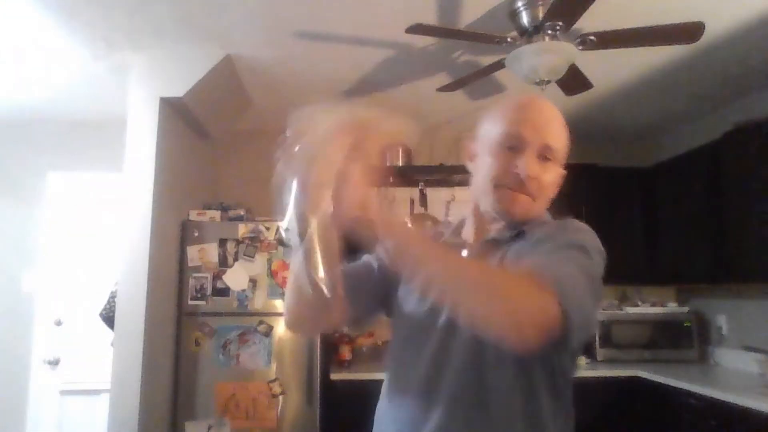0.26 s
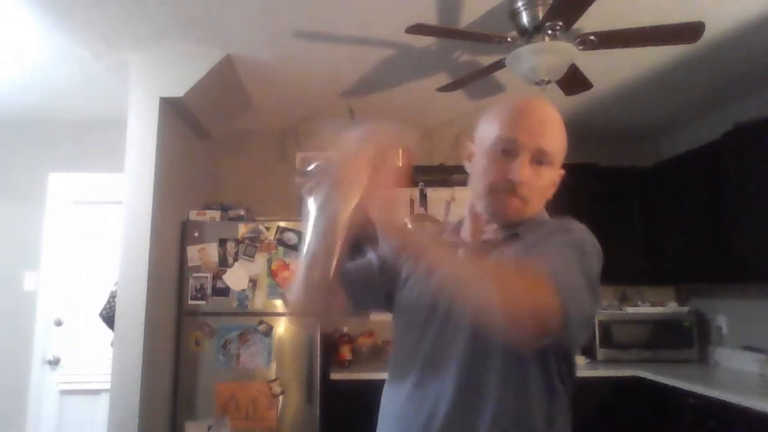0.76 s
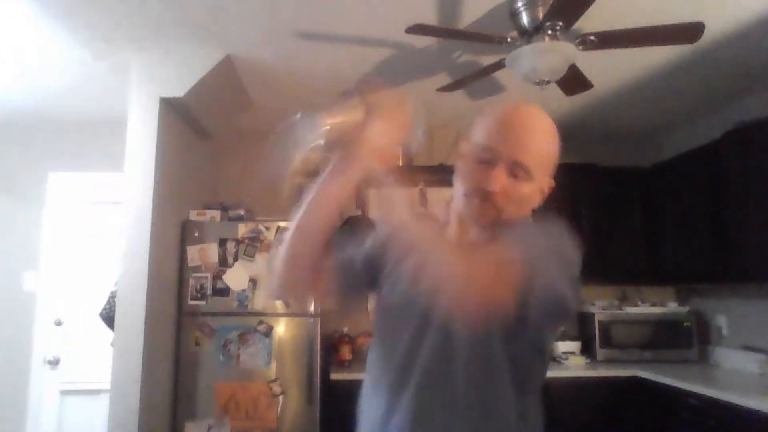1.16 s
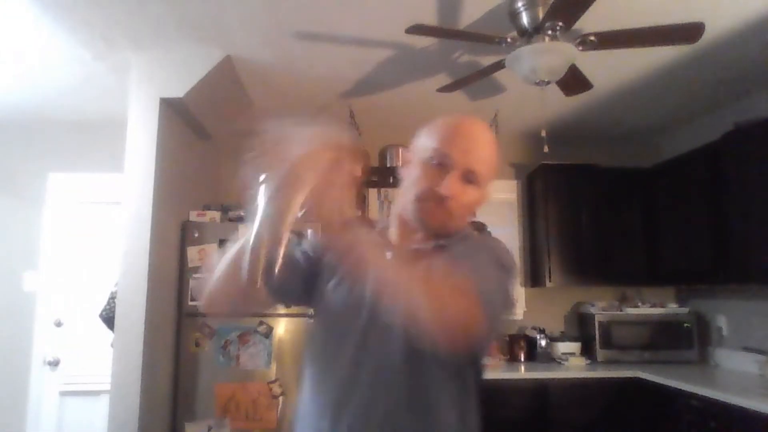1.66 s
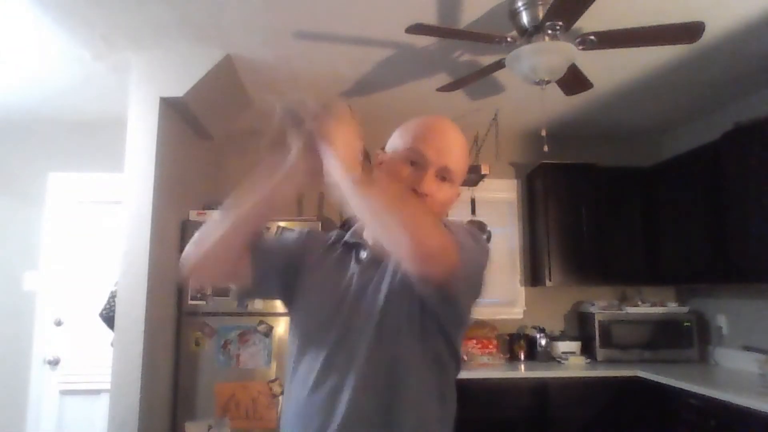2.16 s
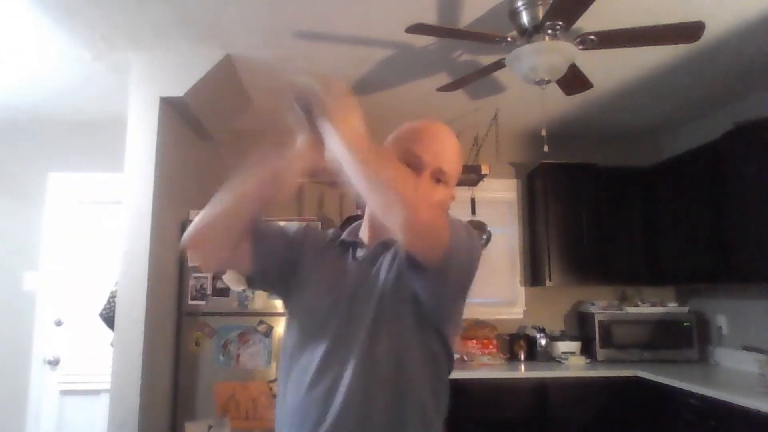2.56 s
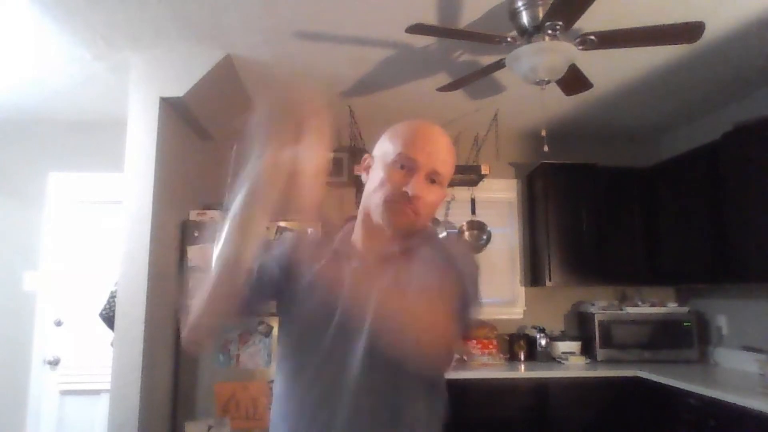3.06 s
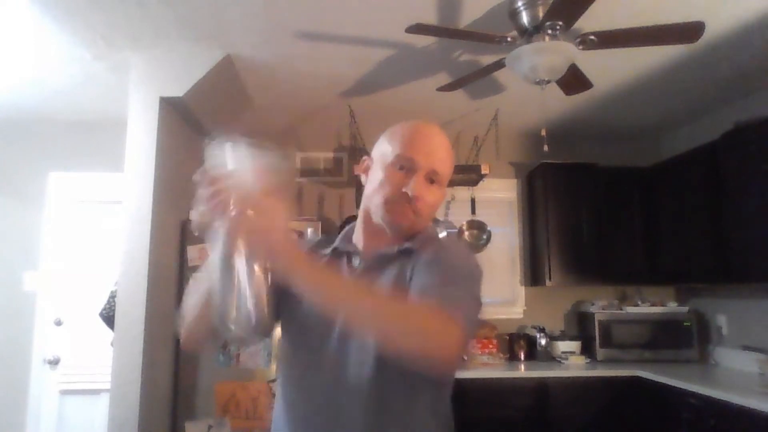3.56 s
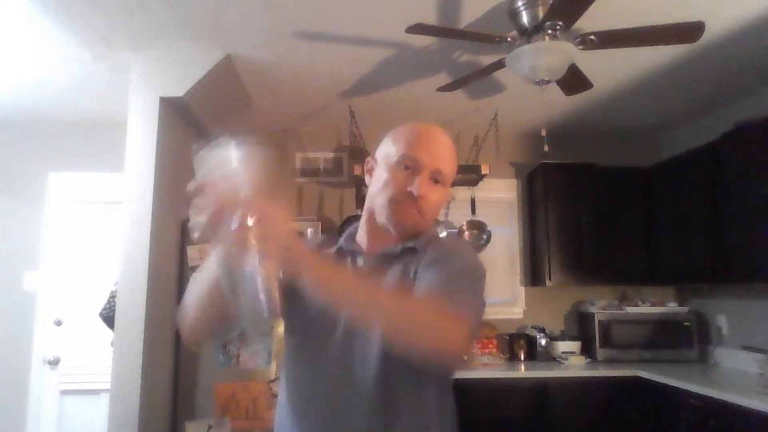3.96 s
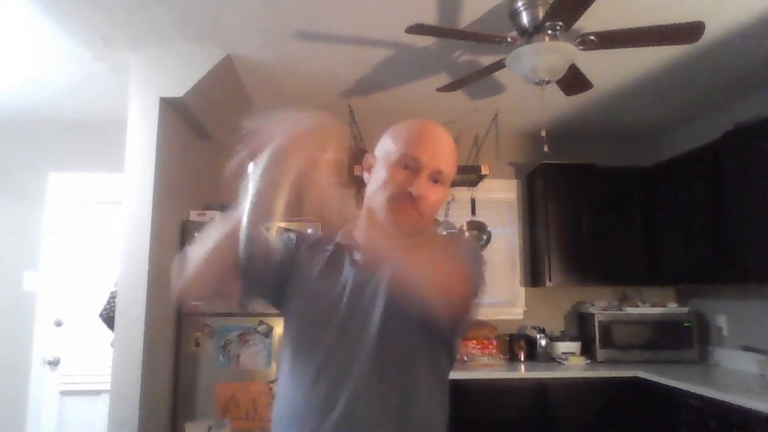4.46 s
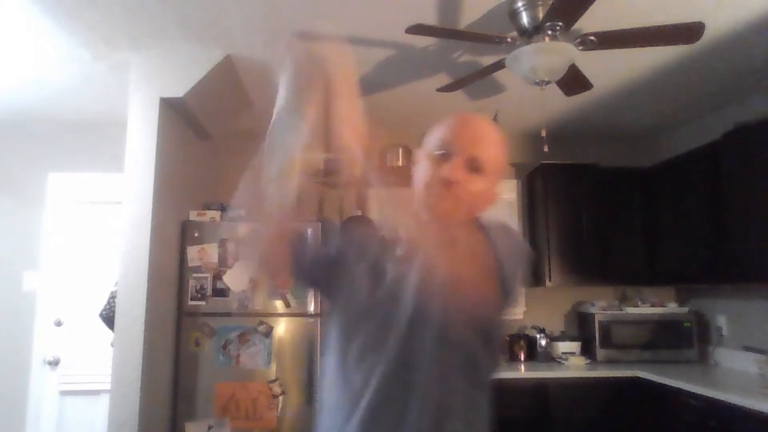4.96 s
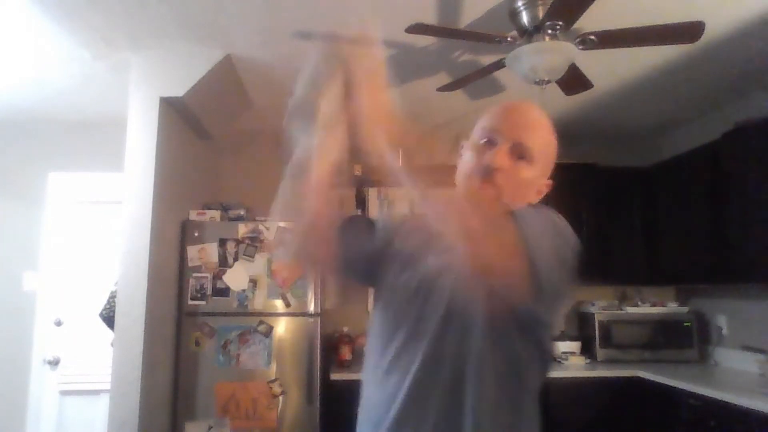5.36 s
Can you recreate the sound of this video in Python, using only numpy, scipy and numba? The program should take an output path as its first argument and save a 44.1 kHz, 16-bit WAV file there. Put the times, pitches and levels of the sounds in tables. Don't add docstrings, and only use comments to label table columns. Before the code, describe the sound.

Vigorous cocktail shaking: crunchy, clattering ice slams from end to end of a metal and glass shaker, with short bright rings.

```python
import sys
import numpy as np
from scipy import signal
from scipy.fft import dct
from scipy.io import wavfile
from scipy.ndimage import uniform_filter1d
from numba import njit

SR = 44100
rng = np.random.default_rng(int(sys.argv[2]) if len(sys.argv) > 2 else 0)


def wav_record(signal):
    frames = np.transpose(np.atleast_2d(signal))
    bounded = np.clip(frames, -1, 1)
    quanta = np.round(bounded * 32767).astype(np.int16)
    wavfile.write(sys.argv[1], SR, quanta)


def attenuation_scalar(level_db):
    decades = np.asarray(level_db, float) / 20
    return 10 ** decades


N = 246959

# [t/s, level/dB, decay/(dB/s), chips re chatter/dB, slosh re chatter/dB]
METAL_STROKES = [(0.088, -37.5, 149, -11, 1.5), (0.495, -28.5, 235, 0, -11), (0.861, -33, 104, 5, -11),
                 (1.236, -51, 80, -1, -30), (1.41, -37, 114, 7, -0.5), (1.789, -31.5, 264, 11.5, 1),
                 (2.196, -28.5, 83.5, 0, -10), (2.51, -28.5, 112, -0.5, -12), (2.908, -27.5, 147, 4, -7),
                 (3.284, -34, 112, 5, -6.5), (3.684, -26, 140, 1, -12.5), (4.079, -36.5, 60, 3, -3),
                 (4.47, -27, 154, 0.5, -9), (4.87, -40.5, 93, 10.5, 3), (5.273, -32.5, 145, 5.5, -2.5)]
# [t/s, level/dB, decay/(dB/s), chips re chatter/dB, slosh re
# chatter/dB]
GLASS_STROKES = [(.002, -26.5, 92, -8, -26), (.249, -31, 50, -5, -18), (.68, -46, 60, -3, -5),
                 (1.02, -46, 50, -11, -33), (1.56, -33.5, 67.7, 2, -14), (1.934, -18, 146, -12, -30.5),
                 (2.284, -21.5, 143, -5.5, -39), (2.696, -24, 138, -3.5, -15.5),
                 (3.097, -21, 121, -5.5, -26.5), (3.512, -27, 90, -5, -20.5), (3.882, -26, 91.5, -2, -16.5),
                 (4.329, -30.5, 81, -2, -28), (4.662, -28, 130, -0.5, -13), (5.081, -26, 140, -0.5, -18.5),
                 (5.488, -33, 53, -10, -12)]
# [t/s, level/dB]
LOOSE_ROLLING = [
    (0, -48),
    (.4, -36.5),
    (1.1, -32),
    (1.7, -37.5),
    (2.1, -36),
    (2.6, -46),
    (3.6, -75),
    (4.2, -31.5),
    (4.8, -46.5),
    (5.6, -33.5),
]

# [t/s, level/dB, strongest ring f/Hz, crack re blow level/dB]
METAL_LANDINGS = [(0.0964, -18.5, 1320, 7), (0.4886, -11, 1530, 10.5), (0.8492, -8.5, 1790, 3),
                  (0.8636, -10, 1800, 7.5), (0.865, -10, 1400, -20), (1.391, -4.5, 1560, -4),
                  (1.409, -17.5, 1670, 4), (1.7761, -10, 1730, 1.5), (1.783, -11, 1390, -14),
                  (2.173, -10.5, 1634, -0.5), (2.4918, -19.5, 1710, 8), (2.5229, -13, 1350, -13),
                  (2.8984, -10.5, 3020, -11), (2.9056, -6.5, 4480, -18), (2.916, -14, 1315, -11),
                  (2.92, -12, 1700, -5), (3.662, -15, 1570, -11), (3.6775, -11.5, 1710, 3.5),
                  (3.686, -12, 1590, 4.5), (4.0692, -11, 3080, 3), (4.084, -13, 1536, -6),
                  (4.4523, -12, 1570, -3), (4.8651, -10, 1705, -7), (4.8797, -12, 1470, -5.5),
                  (5.2512, -8, 1854, -2), (5.269, -8, 2650, -15)]
GLASS_LANDINGS = [(0.237, -16, 1410, -7), (.2542, -19.5, 2040, -7), (.64, -19.5, 1870, -4),
                  (1.0095, -14.5, 2830, -4.5), (1.5349, -19, 1880, -8), (1.9263, -15, 2260, 3),
                  (1.9362, -11, 2050, -24), (2.2699, -11.5, 1680, 2.5), (2.2726, -12, 1990, -20),
                  (2.685, -29, 2500, -10), (3.082, -12, 1900, -24), (3.086, -6.5, 3150, -13),
                  (3.0904, -14, 2060, -10), (3.1055, -14.5, 2050, -19), (3.497, -15, 3650, -0.5),
                  (3.4978, -10.5, 3240, -13), (3.8617, -15.5, 1820, 5.5), (3.876, -12.5, 2110, -10),
                  (3.8826, -4.5, 2085, -7), (3.8918, -12, 1740, -18), (4.2831, -15, 2140, -11),
                  (4.3243, -13, 3400, -3.5), (4.633, -19, 2500, -0.5), (4.6561, -11.5, 4960, -18),
                  (4.6624, -14, 2180, -8), (5.0697, -4.5, 2010, -9.5), (5.078, -16, 1700, -29),
                  (5.4855, -13, 1864, -4)]
REBOUNDS = [
    (0.501, -12, 2630, -15),
    (0.858, -32, 1870, 10),
    (1.419, -32, 4100, 6),
    (3.0153, -22, 1800, -2),
    (3.313, -19, 1650, 2),
    (4.6118, -27, 1120, -4),
]
METAL_STRAYS = [(0.2216, -27, 1880, 14), (0.2816, -18.5, 1820, -6), (0.6, -21, 1100, 0.5),
                (0.678, -24, 1640, 0), (1.2953, -22, 1770, -1.5), (1.3491, -18.5, 2180, -2),
                (1.516, -19.5, 1100, 1.5), (1.6782, -23, 2120, 1), (1.8855, -17.5, 1185, -1),
                (1.9117, -25, 1740, 4), (2.212, -22.5, 1950, 8), (2.469, -17, 1500, -5),
                (2.552, -21, 1190, 0.5), (2.651, -23, 1200, 0), (2.8797, -16, 1360, -3),
                (3.0429, -19, 1110, -17), (3.2615, -17, 1520, -6), (3.3489, -11, 1550, -6),
                (3.4454, -18.5, 1340, -12), (3.7366, -10.5, 1550, -0.5), (4.2227, -17.5, 1430, 1.5),
                (4.8215, -15, 1880, -11), (4.834, -17.5, 1570, -4), (4.939, -22, 1200, -10),
                (5.1907, -16, 1890, -10), (5.3124, -13.5, 1710, -12)]
GLASS_CLICKS = [(.0034, -15, 3630, -2.5), (0.079, -20, 2430, -14), (0.361, -16.5, 3440, -2.5),
                (0.4126, -22.5, 3180, 3), (0.438, -17, 3800, -3), (0.756, -9, 5700, -4),
                (0.8073, -17, 2630, -3), (0.9943, -17.5, 2160, -6), (1.083, -30.5, 2860, 22.5),
                (1.137, -20, 2460, -11), (1.258, -15, 4100, -12), (1.3366, -16, 2580, 2.5),
                (1.5704, -11, 4460, -19), (1.6593, -11.5, 3260, 0), (1.7207, -15, 3540, -1.5),
                (1.751, -18.5, 2640, 4), (1.7944, -9.5, 5320, 0), (2.065, -13, 3310, 2),
                (2.116, -18, 3630, 1), (2.8265, -18.5, 2550, -13), (2.8364, -18, 2760, -2.5),
                (3.229, -11.5, 2980, -6), (3.4398, -17.5, 2580, -6), (3.6278, -18.5, 2930, -1.5),
                (3.8108, -19, 2580, -15), (3.994, -13.5, 4770, -33), (5.439, -20, 2580, -4)]
PILE_KNOCKS = [(0.0143, -37, 1980, 0), (0.0738, -25, 1700, -8), (0.0719, -20.5, 4030, 8),
               (0.1058, -18, 1790, -9), (0.21, -23.5, 1510, -10.0), (0.2487, -15, 1940, -3),
               (0.2703, -24, 2100, 1), (0.286, -23, 1650, -9.5), (0.3829, -19, 2630, -19),
               (0.4045, -28, 2470, 2), (0.4915, -13.5, 1800, -3.0), (0.4825, -21, 1800, 5),
               (0.5245, -22, 4830, -8), (0.6557, -25, 1270, -10), (0.7043, -24.5, 1350, -15),
               (0.7393, -24.5, 1800, 1), (0.7967, -24, 2190, 2), (0.8172, -21, 2610, 4),
               (0.821, -21, 2640, 1), (0.9083, -24, 1800, -12), (0.9818, -20, 1920, -19),
               (1.0014, -22.5, 2190, -6), (1.1202, -19.5, 3360, -4), (1.167, -26, 1800, 3),
               (1.1786, -28, 1980, 4), (1.2281, -23, 1870, -14), (1.274, -23, 3400, 3.5),
               (1.2781, -22, 2580, -3), (0.732, -24, 1750, -1), (1.4164, -17.5, 2870, 16),
               (1.5263, -17.5, 2130, -5), (1.737, -18, 4330, 2), (1.9225, -14.5, 1730, -5),
               (1.9503, -19, 4170, -9), (1.9959, -25, 2570, -18), (2.1248, -19, 3100, -10),
               (2.133, -24.5, 1780, 5), (2.2027, -21, 1560, 4), (2.2063, -19.5, 1800, -4),
               (2.2414, -21, 1920, -11), (2.2786, -6.5, 1976, 0.5), (2.308, -11.5, 3460, -0.5),
               (2.3402, -19, 1740, -5), (2.4479, -15.5, 1520, -3), (2.4975, -15, 1420, -7),
               (2.5689, -17.5, 1690, -1), (2.6758, -17, 2930, -16)]
LATE_KNOCKS = [(2.6934, -15, 3500, -7), (2.7002, -22, 2290, 2.5), (2.7608, -23, 2100, -17),
               (2.8661, -15.5, 4060, 0.5), (2.8919, -18, 1690, -2.5), (2.9589, -19.5, 1390, -4),
               (3.0538, -19.5, 1320, 0), (3.0597, -23.5, 1930, 2), (3.114, -21, 3750, 4),
               (3.1415, -35, 1800, 4), (3.1547, -18.5, 1890, -1), (3.1632, -36, 1820, -2),
               (3.2708, -19, 1690, -6), (3.281, -21.5, 1730, -1), (3.3598, -15, 1560, -9),
               (3.4837, -26, 1690, -11), (3.5029, -15.5, 1900, -15), (3.5417, -18, 2220, -13),
               (3.5523, -23, 3370, -14), (3.6131, -23, 3060, -10), (3.6178, -22, 1890, 3),
               (3.6679, -23, 1650, -7), (3.831, -21.5, 1340, -7), (3.9161, -20, 1850, -8.0),
               (3.9356, -17.5, 1830, -0.5), (3.9803, -23, 3070, 2.5), (4.0604, -23, 1690, 5),
               (4.0782, -10, 4170, -3), (4.0976, -23, 1540, 5), (4.1207, -18, 3580, 2.5),
               (4.1606, -23, 1120, -1), (4.1776, -20.5, 3390, 2), (4.2744, -19, 1810, -2.5),
               (4.4608, -8, 1520, -1.5), (4.4896, -13.5, 1750, -4), (4.6424, -20, 2440, 3),
               (4.8605, -18, 1800, -9), (4.9326, -23.5, 1920, -3), (5.021, -19, 1570, -17),
               (5.0573, -26, 2040, 0), (5.0937, -20, 1910, -2), (5.1954, -19, 2150, 2),
               (5.2201, -25, 1580, -3), (5.2632, -15, 1930, -1), (5.2764, -14, 1820, -16),
               (5.2893, -11, 1530, -9), (5.4581, -23, 1910, 3), (5.5521, -28, 2370, -21),
               (5.594, -19, 1850, -20)]
TICKS = [(0.0856, -32, 1950, 16), (0.2765, -28, 2100, 3), (0.8267, -34.5, 1890, 24),
         (0.8534, -4.5, 1810, -21), (0.8594, -21, 1750, 9), (1.3605, -34, 1790, 13),
         (1.4249, -12, 1400, -9), (1.7696, -18, 1590, 0.5), (1.9198, -14.5, 2090, 1.5),
         (1.9399, -14, 1730, 3), (2.438, -29.5, 1250, 11), (2.5178, -15, 1380, -11.5),
         (2.5267, -25, 1560, -8), (2.8986, -15, 1550, -6), (3.0678, -15.5, 2660, -4),
         (3.0818, -17, 1880, 2.5), (3.2904, -12.5, 3200, -0.5), (3.6923, -19, 1770, -3),
         (3.7137, -22.5, 1660, 3), (3.723, -32, 1920, 18), (4.069, -16.5, 1390, -7),
         (4.4425, -24, 1680, 12), (4.8498, -20.5, 1900, 3.5), (5.0382, -26, 1960, 7),
         (5.1853, -19, 1930, -5)]

# [t/s, level/dB, f/Hz]
THUDS = [(.082, -24.5, 216), (.073, -30, 630), (2.19, -28, 604), (1.419, -28, 585), (4.443, -30, 425),
         (4.938, -31, 800), (.51, -32.5, 660), (2.257, -30, 610), (.4855, -30, 640), (.7568, -30, 720),
         (.864, -22, 630), (.9024, -28, 680), (1.4059, -24.5, 595), (1.7775, -30, 470),
         (1.7924, -25.5, 597), (2.2702, -27.5, 695), (2.5185, -23.5, 470), (2.5497, -29, 540),
         (2.5734, -29.5, 640), (2.9293, -33, 477), (3.3012, -31.5, 587), (3.3447, -27, 606),
         (3.444, -29.5, 890), (3.7125, -25, 540), (3.7462, -24.5, 590), (4.084, -32.5, 463),
         (4.2197, -27.5, 876), (4.4508, -21.5, 527), (4.4686, -25, 544), (4.4877, -19, 387),
         (4.6074, -29, 390), (4.8602, -22, 342), (4.8837, -26.5, 453), (5.0203, -24, 920),
         (5.0642, -29, 826), (5.2686, -29, 584), (5.326, -34, 500)]
# [t/s, level/dB, f/Hz]
SPECKS = [(0.4184, -35, 5020), (0.4599, -22, 5150), (0.4746, -24, 7360), (0.5032, -14, 7350),
          (1.1304, -29, 5990), (1.3217, -24, 5540), (1.3544, -23, 5100), (2.4844, -23, 7100),
          (2.559, -22, 4360), (3.3024, -26, 8600), (3.3234, -27, 7590), (3.4574, -26, 5780),
          (3.7464, -22, 8260), (4.2413, -24, 8100), (4.252, -23, 5750), (4.5296, -25, 5660),
          (4.755, -27, 4610), (5.304, -25, 5210), (5.3322, -20.5, 7800), (5.4316, -26, 9540)]
# [f/Hz, width/Hz, level/dB]
SHELL_ZONES = [
    (1247, 663, -3.5),
    (1800, 490, -4),
    (2580, 930, -2),
    (3540, 1180, -5),
    (4900, 3000, -7.5),
]
# [f/Hz, width/Hz, level/dB]
CRACK_ZONES = [
    (5430, 5460, -11),
    (8740, 1370, -13.5),
    (10960, 7000, -14.5),
    (14200, 3300, -31),
]
# [f/Hz, width/Hz, level/dB]
BELLY_ZONES = [
    (197, 108, -9),
    (387, 194, -2),
    (618, 400, 1),
]
# [t/s, rounding step re local level/dB]
STARVED_FRAMES = [(1.62, 11), (2.252, 15), (2.298, 15), (2.345, 12), (2.717, 15), (2.74, 14), (3.158, 15),
                  (3.553, 13), (3.598, 11), (4.18, 13), (4.365, 12), (4.412, 14), (4.551, 13), (5.155, 13)]

METAL_GATHER_DB_S, GLASS_GATHER_DB_S = 810, 450
CHIPS_GATHER, CHIPS_FALL, SLOSH_GATHER, SLOSH_FALL = 0.46, 1, 0.34, 0.61
LOOSE_CHIPS_DB, LOOSE_SLOSH_DB = -3, -17.5
KITCHEN_T60_S, KITCHEN_DB, KITCHEN_TOP_HZ = 0.27, -10.5, 6840
HUM_DB, RUMBLE_DB, HISS_DB = -40, -33.5, -68
PUMP_DB, TOP_HZ = -25, 15780


def band(x, lo_hz, hi_hz, order=2):
    return signal.sosfilt(signal.butter(order, [lo_hz, hi_hz], "band", fs=SR, output="sos"), x)


@njit
def ring(t_s, hz, size, t60_s, rise_s, phase):
    y = np.zeros(N)
    for k in range(len(t_s)):
        start = max(int(t_s[k] * SR), 0)
        z = size[k] * np.exp(1j * phase[k])
        step = np.exp(2j * np.pi * hz[k] / SR - np.log(1000) / (t60_s[k] * SR))
        gap, close = 1., np.exp(-1 / (rise_s[k] * SR))
        for i in range(start, min(start + int(t60_s[k] * SR), N)):
            z, gap = z * step, gap * close
            y[i] += (1 - gap) * z.imag
    return y


def modes(t_s, hz, db, t60_s, rise_s):
    grid = np.broadcast_arrays(t_s, hz, attenuation_scalar(db), np.maximum(t60_s, .002), np.maximum(rise_s, 1e-5))
    phase = 2 * np.pi * rng.random(grid[0].size)
    return ring(*[1. * g.ravel() for g in grid], phase)


def crunch(t_s, db, zones, t60_s, scatter_db, rise_s=.0001):
    share = rng.standard_normal((len(t_s), len(zones)))
    at = (t_s * SR).astype(int)
    decay = attenuation_scalar(-120 / (t60_s * SR))
    lag = np.exp(-1 / (rise_s * SR))
    out = 0
    for k, (hz, width_hz, zone_db) in enumerate(zones):
        blow = attenuation_scalar(db + zone_db + scatter_db * share[:, k])
        energy = np.bincount(at, blow ** 2, N)[:N]
        energy = signal.lfilter([1], [1, -decay], energy)
        energy = signal.lfilter([1 - lag], [1, -lag], energy)
        noise = np.sqrt(energy * SR / 2 / width_hz) * rng.standard_normal(N)
        out = out + band(noise, hz - width_hz / 2, hz + width_hz / 2)
    return out


def stir(t_s, lift_db, loose_db, gather, fall):
    at_s, db, fall_db_s = np.transpose(np.concatenate([METAL_STROKES, GLASS_STROKES]))[:3, :, None]
    counts = [len(METAL_STROKES), len(GLASS_STROKES)]
    swell_db_s = np.repeat([METAL_GATHER_DB_S, GLASS_GATHER_DB_S], counts)[:, None]
    slope_db = np.minimum(gather * swell_db_s * (t_s - at_s), fall * fall_db_s * (at_s - t_s))
    strokes_db = db + lift_db[:, None] + slope_db
    rolling_db = np.interp(t_s, *np.transpose(LOOSE_ROLLING)) + loose_db
    return 10 * np.log10(np.sum(attenuation_scalar(2 * strokes_db), axis=0) + attenuation_scalar(2 * rolling_db))


def background():
    hum = attenuation_scalar(HUM_DB) * band(rng.standard_normal(N), 98, 245)
    no_lift = np.zeros(len(METAL_STROKES) + len(GLASS_STROKES))
    swing_db = stir(np.arange(0, N, 100) / SR, no_lift, 0, 1, 1)
    gusts = attenuation_scalar(.5 * (swing_db + 33)).repeat(100)[:N]
    rumble = attenuation_scalar(RUMBLE_DB) * gusts * band(rng.standard_normal(N), 12, 62)
    hiss = attenuation_scalar(HISS_DB) * rng.standard_normal(N)
    return hum + rumble + hiss


def chatter():
    chips_lift_db, slosh_lift_db = np.transpose(np.concatenate([METAL_STROKES, GLASS_STROKES]))[-2:]
    t_s, size_draw, hz_draw, delay_draw = rng.random((5000, 4)).T
    t_s = t_s * N / SR
    size_db = np.minimum(-3.8 * np.log(size_draw), 9)
    db = stir(t_s, 0 * slosh_lift_db, 0, 1, 1) + size_db
    chips_db = stir(t_s, chips_lift_db, LOOSE_CHIPS_DB, CHIPS_GATHER, CHIPS_FALL) + 1.06 * size_db
    slosh_db = stir(t_s, slosh_lift_db, LOOSE_SLOSH_DB, SLOSH_GATHER, SLOSH_FALL) + 0.86 * size_db
    pings = modes(t_s, 1450 * 6.1 ** (hz_draw ** 1.9), db - 13.5, 0.02, 0.00022)
    wall = crunch(t_s, db - 14, SHELL_ZONES[1:], 0.015, 5.96)
    deep_wall = crunch(t_s, (db + slosh_db) / 2 - 8.0, SHELL_ZONES[:1], 0.016, 5.1)
    chips = crunch(t_s + .012 * delay_draw, chips_db - 6, CRACK_ZONES, .011, 4.0)
    slap = crunch(t_s, slosh_db - 8.5, BELLY_ZONES, 0.015, 4.5, rise_s=0.00046)
    return pings + wall + deep_wall + chips + slap


def shell_rings(t_s, db, hz):
    spot = 1.111 + 2 * rng.random(len(t_s))
    ratio = np.array([1 + 0 * t_s, 1.142 + 0 * t_s, spot])
    mode_db = db + np.array([[6], [-2], [-4]])
    rings = modes(t_s, hz * ratio, mode_db, 25 / np.maximum(hz, 1750), .0007)
    linger = crunch(t_s, db - 16.5, SHELL_ZONES[1:2], 0.11, 0.87, rise_s=0.0012)
    deep_db = db - 7 - 30 * np.log10(np.maximum(hz / 1450, 1))
    deep = crunch(t_s, deep_db, SHELL_ZONES[:1], 0.02, 1.95, rise_s=0.00024)
    rest = crunch(t_s, db - 11, SHELL_ZONES[1:], 0.026, 3.2, rise_s=0.00023)
    return rings + linger + deep + rest


def ice_cracks(t_s, db, crack_re_blow_db):
    crack_db = db + crack_re_blow_db
    thin_db = 0.7 * np.maximum(crack_re_blow_db - 3.5, 0)
    main = crunch(t_s, crack_db - 0.5 - thin_db, CRACK_ZONES[:1], 0.034, 1.54)
    narrow = crunch(t_s, crack_db - 7.0, CRACK_ZONES[1:2], 0.025, 1.4)
    top = crunch(t_s, crack_db + 1.5, CRACK_ZONES[2:], .01, 3.)
    glint_hz = 3400 * 3 ** rng.random((len(t_s), 2)).T
    glints = modes(t_s, glint_hz, crack_db - thin_db - 3.5, .012, 0.00043)
    spikes = np.bincount((t_s * SR).astype(int), attenuation_scalar(crack_db + 3.5), N)[:N]
    return main + narrow + top + glints + band(spikes, 2200, 15000)


def cubes():
    blows = np.concatenate([METAL_LANDINGS, GLASS_LANDINGS, REBOUNDS, METAL_STRAYS, GLASS_CLICKS,
                            PILE_KNOCKS, LATE_KNOCKS, TICKS])
    t_s, db, hz, crack_re_blow_db = np.transpose(blows)
    t_s = np.minimum(t_s, (N - 1) / SR)
    return shell_rings(t_s, db, hz) + ice_cracks(t_s, db, crack_re_blow_db)


def kitchen(x, count=4):
    t_s = np.arange(SR // 2) / SR
    place = np.arange(N) / SR * 2.6 % 1 * count
    out = 0
    for k, noise in enumerate(rng.standard_normal((count, len(t_s)))):
        dull = band(noise, 460, KITCHEN_TOP_HZ, order=1) * attenuation_scalar(-60 * t_s / KITCHEN_T60_S)
        bright = .5 * noise * attenuation_scalar(-60 * t_s / 0.29)
        tail = (dull + bright) * (t_s > .003)
        tail = tail / np.sqrt(np.sum(tail ** 2))
        distance = np.abs((place - k + count / 2) % count - count / 2)
        here = np.maximum(1 - distance, 0)
        out = out + signal.fftconvolve(x * np.sqrt(here), tail)[:N]
    return out * attenuation_scalar(KITCHEN_DB)


def thuds():
    t_s, db, hz = np.transpose(THUDS)
    boom = modes(t_s, hz, db + 10.5, 0.013 + 7 / hz, 0.99 / hz)
    return boom + crunch(t_s, db - 6.5, BELLY_ZONES[1:], 0.05, 0.64, rise_s=0.0024)


def specks():
    t_s, db, hz = np.transpose(SPECKS)
    return modes(t_s, hz, db + 3, .009, .0003) + crunch(t_s, db + 5, CRACK_ZONES[1:], .009, 2.1)


def scene():
    shaker = chatter() + cubes() + thuds() + specks()
    return (background() + shaker + kitchen(shaker))[None]


def starve(x, size=1536):
    window = np.sin(np.pi * (np.arange(size) + .5) / size)
    hz = np.arange(size) * SR / 2 / size
    coarseness = np.interp(hz, [2500, 5500, 9500, 11000], [.05, 1, 1, 2.2])
    y = x.copy()
    for t_s, step_db in STARVED_FRAMES:
        middle = int(t_s * SR)
        part = slice(middle - size // 2, middle + size // 2)
        lines = dct(window * x[part], 4, norm="ortho")
        local = uniform_filter1d(np.abs(lines), 200) + 1e-9
        step = attenuation_scalar(step_db) * local * coarseness
        change = step * np.round(lines / step) - .94 * lines
        y[part] += window * dct(change, 4, norm="ortho")
    return y


def low_pass(x):
    return signal.sosfilt(signal.butter(12, 16970, fs=SR, output="sos"), x)


def record(dry):
    rounded = np.tanh(1.384 * dry) / 2.324
    x = signal.sosfilt(signal.butter(3, 130, "high", fs=SR, output="sos"), rounded)
    x = x + attenuation_scalar(PUMP_DB) * band(x ** 2, 18, 64)
    x = signal.sosfilt(signal.ellip(10, .3, 55, TOP_HZ, fs=SR, output="sos"), x)
    mix = starve(x[0])[None]
    return low_pass(mix)


dry = scene()
out = record(dry)
wav_record(out)
```